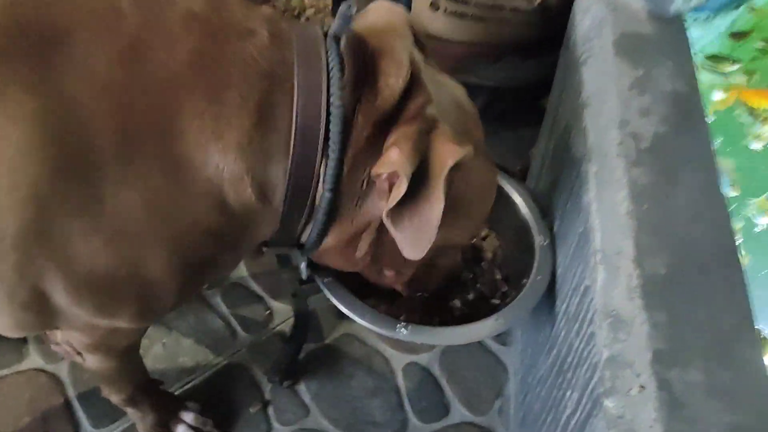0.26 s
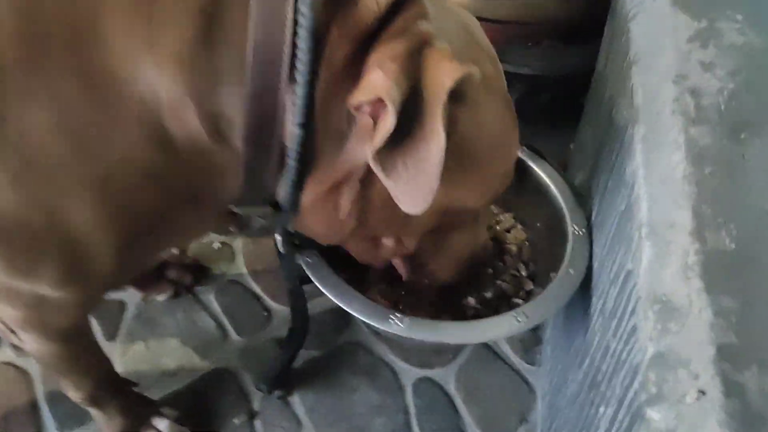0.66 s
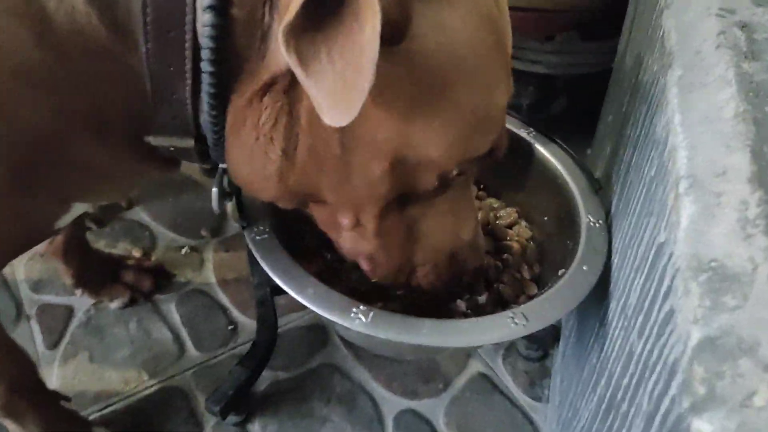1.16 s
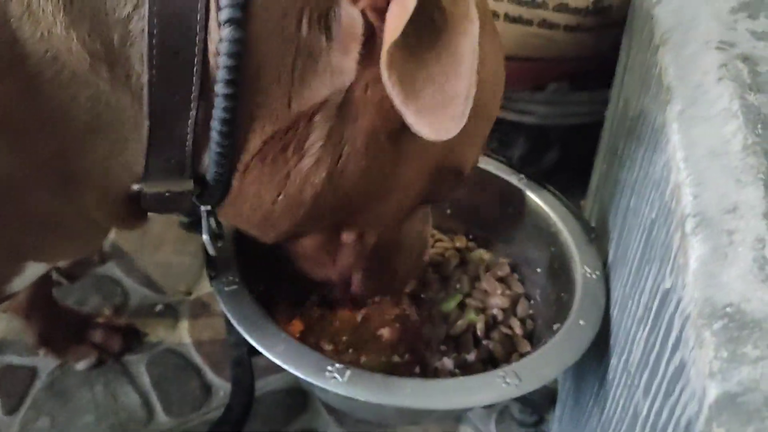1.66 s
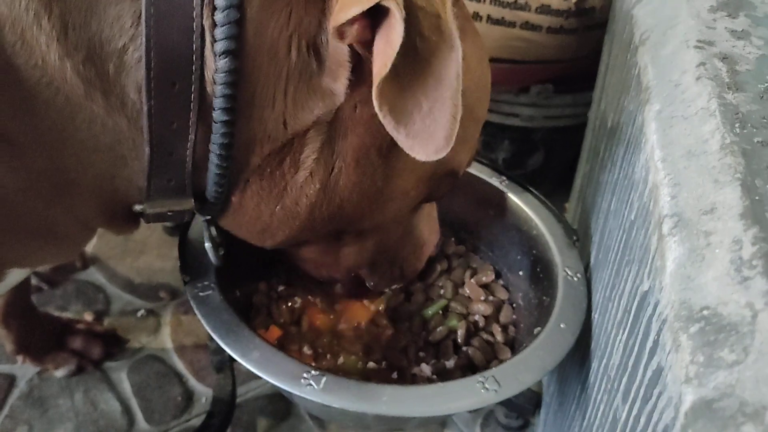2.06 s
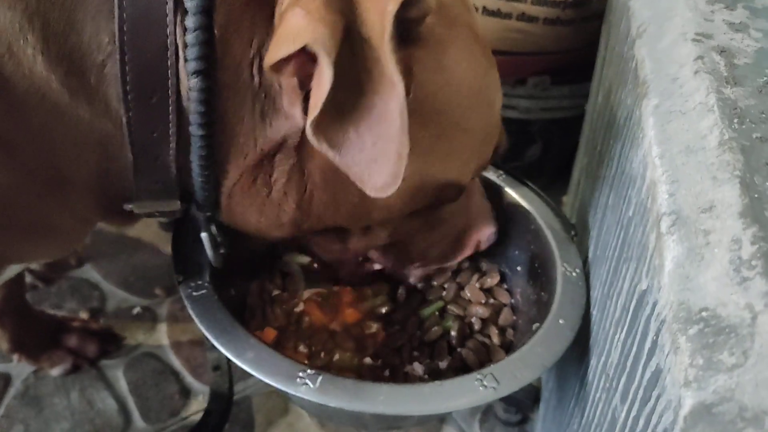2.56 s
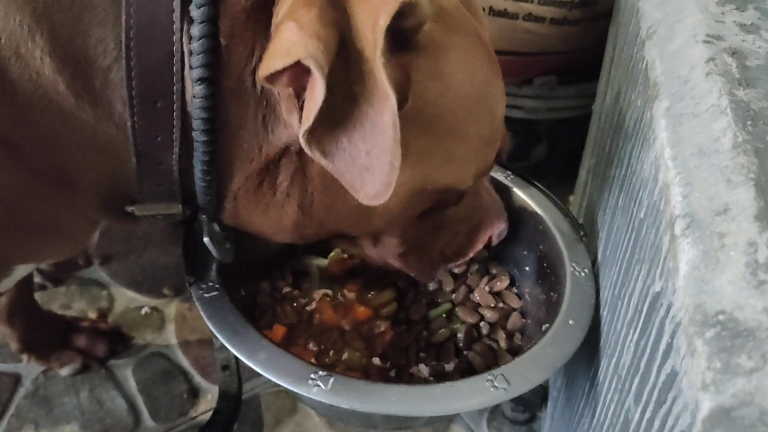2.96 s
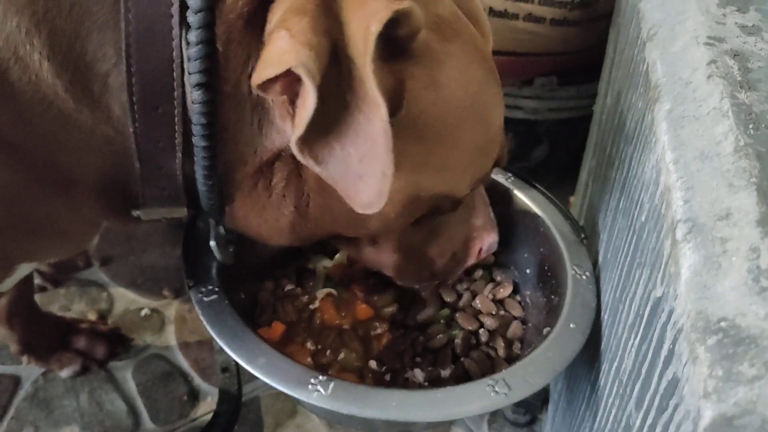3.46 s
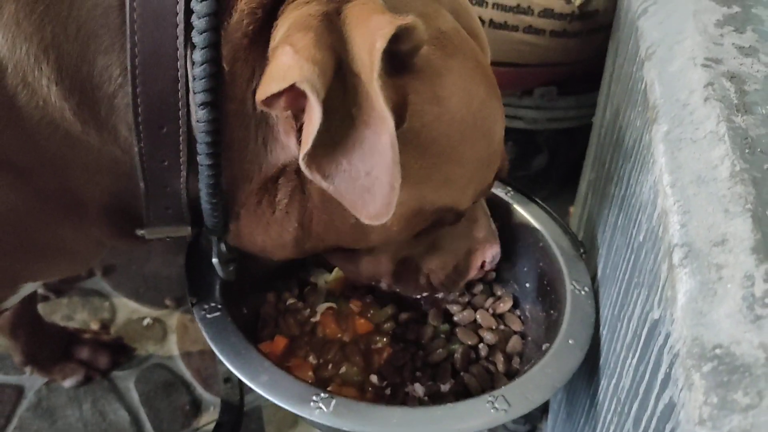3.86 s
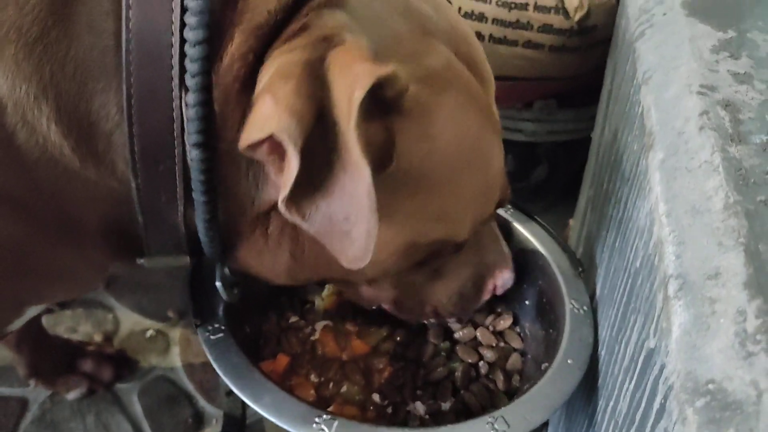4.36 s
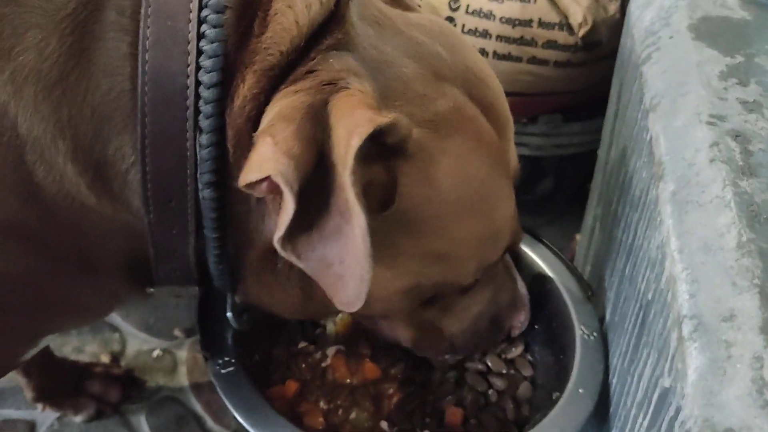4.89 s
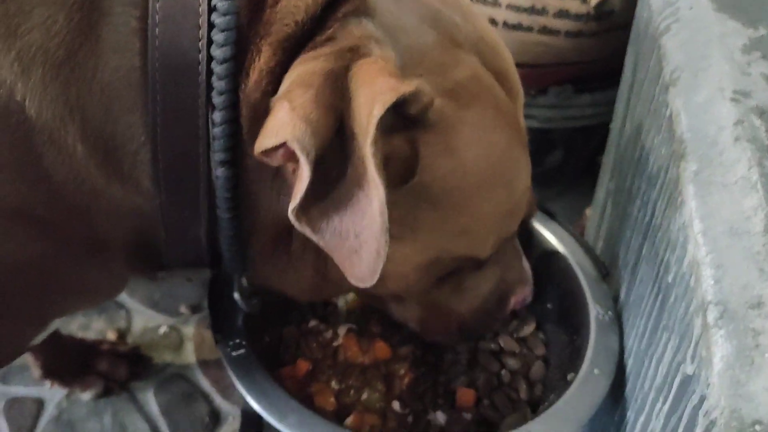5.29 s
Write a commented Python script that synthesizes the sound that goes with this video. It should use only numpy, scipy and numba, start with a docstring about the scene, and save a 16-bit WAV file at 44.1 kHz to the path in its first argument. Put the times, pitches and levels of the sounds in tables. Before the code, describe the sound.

Water bubbles and trickles into a pond without a break, leaning to the left, with frequent glugs and light spatter. Over it, close to the microphone, a dog smacks, slurps and crunches through a bowl of wet food. The steel bowl shifts on the stone with soft low rings, and sharp knocks stand out near the start and just past the middle. The space sounds nearly dry.

```python
"""Dogs chew wet food from steel bowls on a stone floor, beside a pond into which water gurgles.
Lip smacks, crunches, snaps and knocks are brief damped resonances; nudged bowls ring in their low modes.
The water sounds through bubbles that rise in pitch, over droplets, a fine spray and a low hum.
Sound reaches the left microphone port of a nearby phone first; wall and floor add a short smear."""
import sys
import numpy as np
from scipy import signal
from scipy.fft import rfft, irfft
from scipy.io import wavfile
from scipy.ndimage import uniform_filter1d
from numba import njit

SR = 44100
rng = np.random.default_rng(int(sys.argv[2]) if len(sys.argv) > 2 else 0)


def persist_wave(psi):
    """Save psi, clipped to +-1, as 16-bit WAV."""
    counts = np.round(np.clip(psi, -1, 1) * 32767).astype(np.int16)
    wavfile.write(sys.argv[1], SR, np.atleast_2d(counts).T)


N = 243873
FREQS = np.fft.rfftfreq(N, 1 / SR)
LAG_S, MOUTH_ASIDE = 0.00046, .25  # lag between ports; share of it for a mouth nearly in front


def undb(db):
    return 10 ** (np.asarray(db) / 20)


def level(x, db):
    return x * undb(db) / np.sqrt(np.mean(x ** 2))


def at(table, hz):
    """Interpolation of a spectrum on a log-frequency axis."""
    f, v = np.transpose(table)
    return np.interp(np.log(np.maximum(hz, 1)), np.log(f), v)


def highpass(x, order, hz):
    return signal.sosfilt(signal.butter(order, hz, "high", fs=SR, output="sos"), x)


def walk(rate):
    """Random modulation: `rate` values a second, smoothed and softly limited."""
    k = int(SR / rate)
    steps = np.repeat(rng.standard_normal(N // k + 1), k)
    return 1.8 * np.tanh(uniform_filter1d(uniform_filter1d(steps, k), k)[:N])


@njit
def ring(n, start, hz, t60, rise, glide, size):
    """Damped oscillators: onset time is the share `rise` of t60, and pitch climbs by the share `glide`."""
    out = np.zeros(n)
    for g in range(len(start)):
        length = int(t60[g] * SR)
        phase, fall, onset = 0., 1., 1.
        for j in range(min(length, n - start[g])):
            phase += 2 * np.pi * hz[g] * (1 + glide * j / length) / SR
            fall *= 1 - np.log(1000) / length
            onset *= 1 - 1 / (1 + rise * length)
            out[start[g] + j] += size[g] * fall * (1 - onset) * np.sin(phase)
    return out


def grains(s, hz, t60, db, pan_db, rise, glide, aside=1, scatter=.28):
    """Path difference: each ring reaches the right port later, by a lag set by its direction."""
    hz = np.clip(hz, 30, 9000)
    bend = np.minimum(hz / 1800, 1) ** .3  # low tones bend round the phone and lag less
    lag = aside * LAG_S * np.clip(bend + scatter * rng.standard_normal(len(s)), 0, 2)
    return np.array([ring(N, (t * SR).astype(np.int64), hz, t60, rise, glide, undb(db + side_db))
                     for t, side_db in ((s, pan_db / 2), (s + lag, -pan_db / 2))])


def events(s, db, hz, t60, pan_db, rise, glide, count, spread=0, smear_s=0, aside=1):
    """Superposition: each event is `count` rings, all but the first scattered in time and pitch."""
    s, db, hz, t60, pan_db = np.repeat(np.broadcast_arrays(s, db, hz, t60, pan_db), count, axis=1)
    delay, detune = rng.standard_normal((len(s), 2)).T * (np.arange(len(s)) % count > 0)
    late = abs(delay)
    fade = np.log(1000) * rise
    peak = (1 + 1 / fade) ** -fade / (1 + fade)  # top of a ring that swells while it fades
    rings = grains(s + smear_s * late, hz * np.exp(spread * detune), np.clip(t60, .003, .3),
                   db - 4 * late, pan_db, rise, glide, aside, scatter=.1)
    return rings / (peak * np.sqrt(count / 2))


def swarm(low_hz, high_hz, colour, cycles, scatter_db, pan_db, pan_spread_db, rise, glide, count):
    """Shot noise at unit rms: rings at random times, a few much louder than the rest."""
    when, pitch, strength, side = rng.random((count, 4)).T
    hz = low_hz * (high_hz / low_hz) ** pitch
    db = at(colour, hz) + 10 * np.log10(hz) - scatter_db * np.log(1 - .98 * strength)
    pan_db = pan_db + pan_spread_db * (2 * side - 1)
    return level(grains(when * N / SR, hz, cycles / hz, db, pan_db, rise, glide), 0)


# Strength of the wet sounds. Each row: time in seconds, then gurgle, slurp, spatter, fizz, rumble in dB.
FLOW_LEVELS = [(0.0, -54.5, -57, -61.5, -50.5, -70), (0.21, -42, -49, -52.5, -48.5, -74),
               (0.32, -41.5, -49, -55.5, -49, -69.5), (0.369, -41.5, -65.5, -56, -46, -59),
               (0.421, -48, -41.5, -51, -48.5, -63.5), (0.48, -38, -52, -52, -52.5, -67),
               (0.55, -39, -44.5, -51, -48, -68.5), (0.569, -47.5, -40, -52.5, -44, -55.5),
               (0.631, -34, -47.5, -48, -49, -67.5), (0.662, -39.5, -45.5, -52, -46.5, -59.5),
               (0.91, -39.5, -47, -49, -44.5, -66.5), (0.95, -42, -39.5, -51, -44.5, -69),
               (1.109, -41, -54, -55, -46.5, -56.5), (1.2, -32.5, -50.5, -48.5, -49, -62),
               (1.26, -39.5, -57, -51.5, -46.5, -62), (1.539, -39, -52.5, -55, -48.5, -64.5),
               (1.62, -41, -44.5, -55.5, -48.5, -62.5), (1.859, -39, -47.5, -49, -48.5, -71),
               (1.969, -47, -63.5, -50.5, -43.5, -75), (2.048, -34.5, -39.5, -44, -47, -62),
               (2.23, -42, -50.5, -53, -46.5, -71), (2.4, -36, -45.5, -50.5, -48, -72.5),
               (2.431, -40.5, -41, -51.5, -48, -62.5), (2.658, -37.5, -50, -53, -50.5, -71.5),
               (2.762, -33.5, -44, -47.5, -47.5, -74.5), (2.822, -38.5, -50.5, -49, -47, -67.5),
               (3.48, -39, -46, -48.5, -48, -72), (3.899, -37, -45.5, -50.5, -49.5, -69),
               (4.158, -38, -58.5, -53.5, -47.5, -68), (4.189, -37.5, -61, -49.5, -46, -62),
               (4.48, -38, -43.5, -49, -47.5, -75.5), (4.739, -38.5, -49, -50.5, -47.5, -63),
               (5.2, -36, -52, -50.5, -47.5, -62), (5.31, -39.5, -42, -47.5, -47, -69),
               (5.438, -40, -47, -54, -50.5, -77), (5.53, -41, -45.5, -55.5, -51, -72.5)]
def flow():
    """Amplitude envelopes: five levels in dB, each moving linearly between its listed values."""
    s, *columns = np.transpose(FLOW_LEVELS)
    return [np.interp(np.arange(N) / SR, s, column) for column in columns]


# Spectrum of falling water. Each row: frequency in Hz, relative spectral density in dB.
WATER_SPECTRUM = [(24, -33), (40, -25), (86, -32.5), (256, -23), (438, -27.5), (613, 3.5), (670, 5.5),
                  (981, -4), (1310, -8.5), (1920, -28.5), (3510, -21), (5250, -27.5), (6720, -14.5),
                  (7510, -17), (8400, -91.5), (10900, -107), (18500, -120)]
# Likeness of the spray at the two ports. Each row: frequency in Hz, coherence from 0 to 1.
COHERENCE = [(60, 1), (300, 0.52), (900, 1), (1300, 0.59), (2600, 0.2), (6000, 0), (8000, 0)]
# Slow flicker of the spray. Each row: frequency in Hz, depth in dB.
FLICKER_DEPTH = [(100, 3.5), (700, 1), (2200, 4.5), (4800, 5), (5800, 1.5), (7000, 1)]
# Passing dips of the spray at the right port. Each row: frequency in Hz, depth in dB.
RIGHT_DIPS = [(100, 2), (700, 2.5), (2200, 2), (4800, 12.5), (7000, 7)]
def spray(gurgle_db, slurp_db, spatter_db, fizz_db, rumble_db):
    """Partly coherent noise: bands of falling water slosh together and flicker alone."""
    out, slosh, patch = 0, walk(14), walk(9.9)
    spectrum = undb(at(WATER_SPECTRUM, FREQS))
    swells = (rumble_db, gurgle_db, slurp_db, spatter_db, fizz_db)
    for hz in 40 * 2 ** np.arange(0, 7.9, 1 / 4):
        quarter_octaves = 4 * np.log2(np.maximum(FREQS, 1) / hz)
        band = spectrum * np.cos(np.clip(quarter_octaves, -1, 1) * np.pi / 2)
        left, unrelated = (irfft(band * rfft(rng.standard_normal(N)), N) for _ in range(2))
        alike = at(COHERENCE, hz)
        lag = int(LAG_S * SR * min(hz / 1800, 1) ** .3)
        right = alike * np.roll(left, lag) + np.sqrt(1 - alike ** 2) * unrelated
        swell_db = swells[np.digitize(hz, (350, 900, 1600, 5400))]
        patch = .8 * patch + .6 * walk(10)  # neighbouring bands share most of it
        band_db = swell_db + 1.4 * slosh + at(FLICKER_DEPTH, hz) * patch + 4.6 * walk(35)
        right *= undb(-at(RIGHT_DIPS, hz) * abs(walk(4.4)))
        out = out + undb(band_db) * np.array([left, right])
    return level(out, -36.5)


# Bands of a low hum. Each row: centre in Hz, width in Hz, base level in dB.
HUM_BANDS = [(79, 17, -76.5), (102, 56, -73), (188.8, 22, -75)]
def hum(rumble_db):
    """Narrowband noise: low, unsteady tones that waver with the rumble."""
    out = 0
    for hz, width, db in HUM_BANDS:
        tone = irfft(rfft(rng.standard_normal(N)) / (1 + (2 * (FREQS - hz) / width) ** 2), N)
        out = out + level(tone, db) * undb(0.68 * walk(1.5))
    return out * undb(rumble_db + np.array([[2.5], [-2.5]]))


# Spectrum of small bubbles. Each row: frequency in Hz, relative spectral density in dB.
BUBBLE_SPECTRUM = [(520, -21), (620, 9.5), (750, 4.5), (900, -3), (1050, -12), (1300, 2), (1550, -27.5)]
def gurgle(db):
    """Bubble resonance: small pockets of trapped air ring and climb in pitch as they rise."""
    return undb(db - 4) * swarm(514.2, 1544, BUBBLE_SPECTRUM, cycles=30, scatter_db=1.7, pan_db=24.6,
                                pan_spread_db=2.9, rise=.15, glide=.22, count=2400)


def droplets(spatter_db, fizz_db):
    """Impact excitation: drops ring briefly as a spatter, a sharper crackle and a high fizz."""
    spatter = swarm(1698, 4807, WATER_SPECTRUM, cycles=36, scatter_db=2.5, pan_db=16,
                    pan_spread_db=5.3, rise=.18, glide=.03, count=1800)
    spatter *= undb(spatter_db - 4.5 + 2.6 * walk(12))
    crackle = swarm(1576, 5800, WATER_SPECTRUM, cycles=22, scatter_db=3, pan_db=4,
                    pan_spread_db=5, rise=.03, glide=.01, count=6000)
    crackle *= undb(spatter_db - 8.5 + 3.5 * walk(14) + 2.5 * walk(4))
    fizz = swarm(5430, 8260, WATER_SPECTRUM, cycles=36, scatter_db=7.2, pan_db=22,
                 pan_spread_db=7, rise=.45, glide=.015, count=9000)
    fizz *= undb(fizz_db - 3 + 2.7 * walk(60))
    return spatter + crackle + fizz


# Spectrum of tongues in gravy. Each row: frequency in Hz, relative spectral density in dB.
SLURP_SPECTRUM = [(900, -3.5), (1250, 11), (1600, -9), (2600, -9)]
def slurp(db):
    """Overlapping transients: tongues in gravy make short rings that merge into a wet wash."""
    wash = swarm(944, 2450, SLURP_SPECTRUM, cycles=18, scatter_db=.79, pan_db=4.7,
                 pan_spread_db=1.5, rise=.2, glide=.067, count=4000)
    return wash * undb(db - 4 + 3.2 * walk(18))


# Lip smacks. Each row: start in seconds, level in dB, pitch in Hz.
LIP_SMACKS = [(0.0524, -28.5, 990), (0.1273, -34, 950), (0.1565, -26.5, 1160), (0.1969, -29, 960),
              (0.413, -33, 1070), (0.526, -26.5, 1060), (0.613, -21, 990), (0.6883, -38, 1840),
              (0.7402, -29, 1113), (0.814, -26.5, 1250), (0.847, -30, 1020), (0.9486, -25, 1066),
              (1.0999, -35.5, 1990), (1.1917, -36, 1200), (1.282, -34, 1420), (1.5624, -33, 1320),
              (1.8123, -33.5, 1940), (2.0526, -19, 1240), (2.089, -36, 1190), (2.112, -25.5, 1095),
              (2.1311, -34, 2020), (2.2342, -35, 1970), (2.4005, -34, 1140), (2.438, -30, 1010),
              (2.7008, -35, 2250), (2.7448, -26.5, 1257), (2.7511, -29, 1730), (2.9277, -28, 1420),
              (3.0933, -30.5, 1260), (3.0984, -48, 2020), (3.1453, -41, 2000), (3.1697, -33, 1810),
              (3.2211, -34, 950), (3.498, -26.5, 1150), (3.843, -30, 1130), (4.147, -32, 2120),
              (4.2225, -33.5, 1450), (4.36, -32, 1750), (4.6067, -24, 1050), (4.652, -25.5, 1220),
              (4.8743, -29.5, 2190), (5.142, -34, 1170), (5.2268, -34.5, 1670), (5.257, -33, 1290)]
def smacks():
    """Cavity resonance: the mouth rings hollowly at each smack of the lips."""
    return events(*np.transpose(LIP_SMACKS), t60=.018, pan_db=.5, rise=.0022, glide=.017, count=6,
                  spread=.051, smear_s=.00209, aside=MOUTH_ASIDE)


# Crunches of food. Each row: start in seconds, level in dB, pitch in Hz.
FOOD_CRUNCHES = [(0.1588, -28.5, 4500), (0.179, -27.5, 3550), (0.326, -37, 3440), (0.417, -32.5, 3880),
                 (0.5284, -32, 4870), (0.6492, -27, 3200), (0.7746, -28.5, 3880), (0.924, -40, 4300),
                 (0.952, -23, 4460), (1.1307, -29, 3960), (1.499, -31.5, 3140), (1.565, -31, 3900),
                 (2.004, -26, 3860), (2.1625, -34.5, 2540), (2.3384, -34.5, 2660), (2.694, -32.5, 3540),
                 (2.8672, -30.5, 3180), (2.934, -23.5, 4030), (3.1887, -25, 4730), (3.323, -32.5, 4020),
                 (3.3795, -29, 3030), (3.46, -25.5, 4080), (3.578, -35, 2440), (3.81, -35.5, 2530),
                 (4.046, -36, 3980), (4.072, -30, 3930), (4.151, -28, 3280), (4.1818, -26.5, 2940),
                 (4.368, -31, 2740), (4.435, -34, 4400), (4.501, -29.5, 3040), (4.739, -22, 3250),
                 (4.824, -37, 2910), (5.004, -33.5, 4450), (5.0393, -32.5, 4130), (5.0815, -34, 3240),
                 (5.311, -35, 3140)]
def crunches():
    """Fracture: breaking food releases a tight burst of high clicks."""
    return events(*np.transpose(FOOD_CRUNCHES), t60=.008, pan_db=4.5, rise=.0067, glide=.005, count=8,
                  spread=.075, smear_s=.0036, aside=.8)


def crumbs():
    """Secondary fracture: crumbs break after each smack or crunch, and in small bites at random times."""
    s, db, hz = np.transpose(LIP_SMACKS + FOOD_CRUNCHES)
    grit = events(s, db - 11.5, hz, t60=.023, pan_db=4.5, rise=.03, glide=.01, count=24,
                  spread=.3, smear_s=.02)
    when, strength, pitch = rng.random((110, 3)).T
    chewing = events(when * N / SR, 5 * strength, 1500 * 3.3 ** pitch, t60=.018, pan_db=.5,
                     rise=.04, glide=.005, count=10, spread=.15, smear_s=.015, aside=.8)
    return grit + level(chewing, -58)


# Low modes of a full bowl. Each row: frequency in Hz, time to fall 60 dB in seconds.
BOWL_MODES = [(345, 0.11), (430, 0.12), (505, 0.05)]
# Bowls nudged on stone. Each row: start in seconds, level in dB, favoured pitch in Hz.
BOWL_NUDGES = [(0.294, -51, 333), (0.572, -31.5, 413), (0.825, -48, 370), (0.898, -38, 440),
               (1.187, -31, 438), (1.576, -43, 530), (1.73, -43.5, 345), (3.153, -36.5, 530),
               (4.115, -57, 511), (4.301, -42, 519), (4.469, -44, 506), (4.562, -54, 365),
               (4.606, -55, 350), (4.672, -50, 350), (5.092, -40.5, 518)]
def bowls():
    """Modal vibration: a nudge rattles the bowl's modes, most of all those near its favoured pitch."""
    s, db, favoured_hz = np.transpose(BOWL_NUDGES)
    db_per_octave = 36.5
    return sum(events(s, db - db_per_octave * abs(np.log2(hz / favoured_hz)), hz, t60, pan_db=-.5,
                      rise=.02, glide=.0082, count=6, spread=.07, smear_s=.012) for hz, t60 in BOWL_MODES)


# Bright wet snaps. Each row: start in seconds, level in dB, left minus right in dB.
WET_SNAPS = [(0.296, -44, 8), (0.3232, -24.5, 16), (0.4647, -31, 1), (0.5263, -18.5, -6), (0.531, -30, -10),
             (0.548, -25.5, -8), (0.88, -24, 14), (0.9507, -20, 11), (1.252, -28, 30), (1.3678, -18, 23.5),
             (1.713, -43, 30), (1.7938, -35.5, 29.5), (1.912, -34, 21.5), (2.005, -15, 6),
             (2.398, -21.5, 2.5), (2.496, -35, 8), (3.1568, -23, 18.5), (3.2232, -28, 8), (3.339, -23, 11),
             (3.378, -26, 13), (3.5616, -27.5, 12), (3.692, -34, 38.5), (3.8618, -24.5, 13),
             (4.0037, -39, 39.5), (4.6966, -19, 20), (4.822, -26, 26), (4.903, -27, 24), (5.012, -38.5, 35),
             (5.064, -44.5, 14), (5.208, -34, 30), (5.2898, -33.5, 33), (5.311, -26.5, 18),
             (5.41, -27.5, 19.5)]
def snaps(hz=6796):
    """Heavy damping: a high resonance dies within milliseconds and is heard as a snap."""
    s, db, pan_db = np.transpose(WET_SNAPS)
    return events(s, db, hz, t60=.0064, pan_db=pan_db - at(PORT_BALANCE, hz), rise=.007, glide=.078,
                  count=5, spread=.031, smear_s=.001)


# Single large bubbles. Each row: time of the pop in seconds, level in dB, starting pitch in Hz.
LARGE_BUBBLES = [(0.474, -21.5, 700), (0.611, -28.5, 764), (0.637, -28, 624), (0.73, -26, 658),
                 (0.817, -23, 677), (0.847, -24, 760), (0.884, -28.5, 654), (1.025, -28, 834),
                 (1.113, -30, 637), (1.137, -27, 697), (1.333, -29, 716), (1.365, -26, 633),
                 (1.399, -25, 646), (1.501, -29.5, 730), (1.566, -24, 700), (1.749, -27, 635),
                 (1.81, -30.5, 677), (1.848, -23.5, 708), (2.019, -27.5, 616), (2.04, -23.5, 644),
                 (2.074, -26, 800), (2.335, -26.5, 687), (2.348, -23.5, 732), (2.399, -29, 650),
                 (2.424, -25.5, 740), (2.454, -33, 690), (2.472, -21.5, 610), (2.516, -26.5, 767),
                 (2.537, -26, 713), (2.574, -26, 707), (2.632, -25, 770), (2.682, -28.5, 647),
                 (2.74, -30, 618), (2.834, -28.5, 676), (3.009, -43, 717), (3.134, -21.5, 623),
                 (3.172, -26, 619), (3.227, -19.5, 794), (3.463, -28.5, 635), (3.555, -23.5, 644),
                 (3.782, -33, 804), (3.817, -24, 682), (3.85, -38, 730), (3.869, -26, 774),
                 (3.911, -24, 708), (3.965, -26.5, 682), (4.068, -28.5, 615), (4.169, -22.5, 645),
                 (4.191, -25, 776), (4.273, -24, 790), (4.359, -24, 631), (4.545, -22, 820),
                 (4.607, -24.5, 765), (4.681, -27, 630), (4.715, -24.5, 748), (4.772, -23, 707),
                 (4.821, -36, 743), (4.856, -30, 676), (4.921, -25, 668), (4.969, -26.5, 683),
                 (4.998, -32, 644), (5.041, -25, 703), (5.185, -32, 675), (5.208, -23.5, 677),
                 (5.282, -28.5, 750), (5.451, -26.5, 670)]
def glugs(cycles=21.3, swell_s=.0013):
    """Constant-Q decay: every bubble rings for about as many cycles, so lower ones last longer."""
    s, db, hz = np.transpose(LARGE_BUBBLES)
    return events(s - swell_s, db - 3, hz, t60=cycles / hz, pan_db=3.5, rise=.092, glide=.13, count=1)


# Knocks of teeth or bowl rim. Each row: start in seconds, level in dB, pitch in Hz.
HARD_KNOCKS = [(0.569, -14.5, 1220), (0.6, -25, 1840), (0.58, -22, 2940), (0.5688, -33, 4500),
               (0.585, -27, 870), (1.1922, -22, 616), (1.94, -29.5, 1350), (2.4016, -33, 1530),
               (2.4001, -25, 2100), (3.1, -27, 2580), (3.2215, -29, 1500), (3.2285, -24, 2300),
               (3.2245, -16.5, 3450), (3.2335, -25, 3030)]
def knocks(cycles=6.9):
    """Impulse response: a hard contact rings for a few cycles, with no deep bass."""
    s, db, hz = np.transpose(HARD_KNOCKS)
    rings = events(s, db, hz, t60=cycles / hz, pan_db=3, rise=.083, glide=.042, count=2, aside=MOUTH_ASIDE)
    return highpass(rings, 2, 400)


def wall(x, t60=.05, tail_db=-11):
    """Reflection: floor and pond wall add a short tail, different at each port."""
    t = np.arange(int(.15 * SR)) / SR
    tail = rng.standard_normal((2, len(t))) * undb(-60 * t / t60) * (t > .002)
    tail *= undb(tail_db) / np.sqrt(np.sum(tail ** 2, axis=1, keepdims=True))
    return x + signal.fftconvolve(x, tail, axes=1)[:, :N]


def scene():
    """Superposition: water and feeding sounds, with their reflections, add to the spray and hum."""
    gurgle_db, slurp_db, spatter_db, fizz_db, rumble_db = levels = flow()
    small_bubbles = gurgle(gurgle_db)
    splashes = droplets(spatter_db, fizz_db) + slurp(slurp_db)
    basin = highpass(small_bubbles + glugs(), 4, 530)  # it passes little below its lowest resonance
    impacts = bowls() + knocks()
    bites = highpass(smacks() + crunches() + snaps() + crumbs(), 2, 700)
    swells = [db - db.mean() for db in levels]
    return wall(basin + splashes + impacts + bites) + spray(*swells) + hum(rumble_db - rumble_db.mean())


# Colour of the microphone ports. Each row: frequency in Hz, left minus right in dB.
PORT_BALANCE = [(60, 1.5), (500, 1.5), (1500, 1.5), (4700, 2), (6000, 9), (6700, 14), (6950, 11), (7250, 0),
                (7600, 2), (8300, 4)]
def record(dry, top_hz=8500):
    """Frequency response: each port has its own colour; the phone thins the bass and cuts the top."""
    tilt_db = at(PORT_BALANCE, FREQS) / 2
    coloured = irfft(rfft(dry) * undb([tilt_db, -tilt_db]), N)
    return signal.sosfilt(signal.cheby2(12, 38, top_hz, fs=SR, output="sos"), highpass(coloured, 1, 60))


dry = scene()
out = record(dry)
persist_wave(out)
```